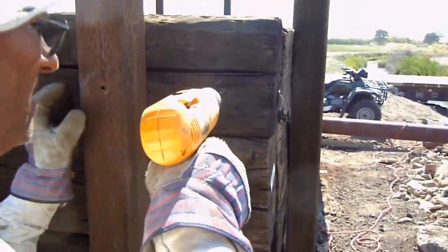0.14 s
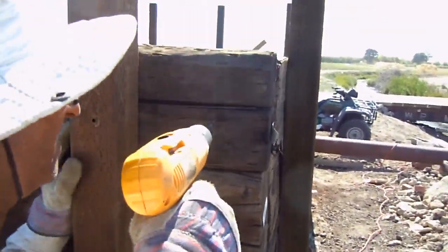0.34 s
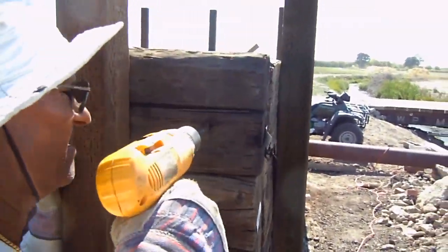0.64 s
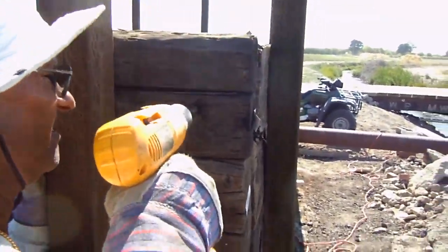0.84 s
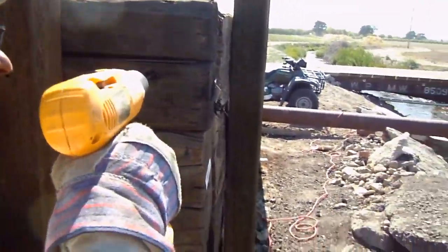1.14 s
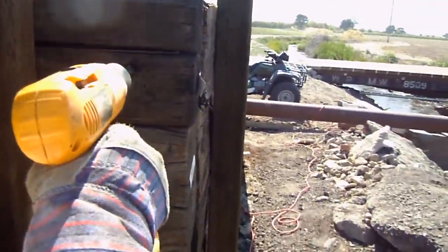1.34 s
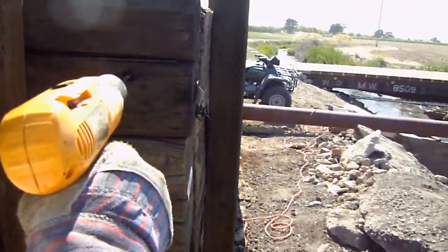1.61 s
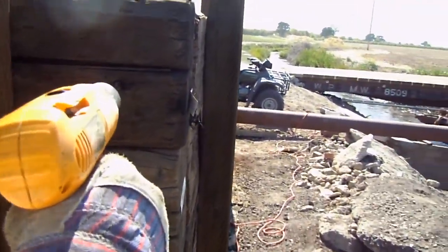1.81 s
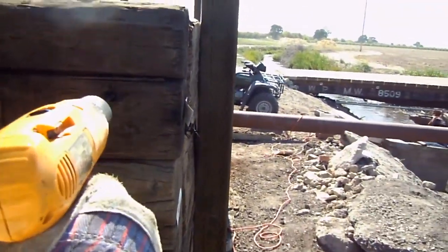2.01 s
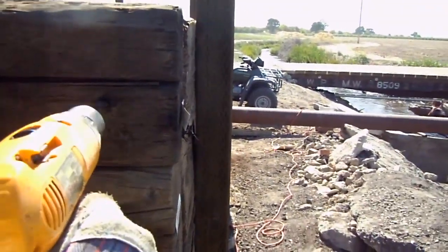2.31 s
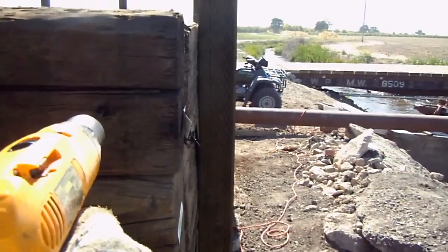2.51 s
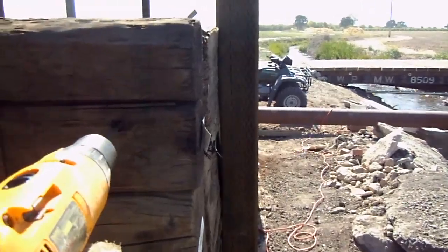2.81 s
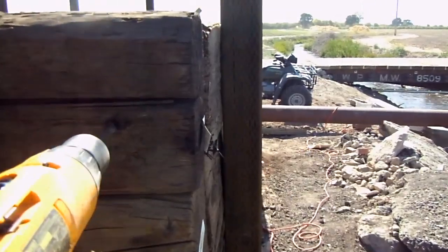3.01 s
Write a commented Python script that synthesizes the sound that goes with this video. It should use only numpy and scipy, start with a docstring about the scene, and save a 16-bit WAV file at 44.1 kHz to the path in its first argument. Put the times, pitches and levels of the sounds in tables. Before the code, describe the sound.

A corded electric drill clicks on, spins up fast to a bright, hissy whine, then sags slightly as it bites thick timber; outdoors, close stereo microphone, with wind rumbling, flapping and thumping throughout.

```python
"""A corded drill spins up and bores into thick timber outdoors: its fan and commutator whine as partials
locked to the shaft, over brush and air hiss made of filtered noise. The pitch sags under load,
the colour of the hiss changes at the bite, and the gears grow louder near the end.
Wind on two microphone ports is low rumble, flapping puffs, noise-burst gusts and pressure thumps."""
import sys
import numpy as np
from scipy import signal
from scipy.fft import rfft, irfft
from scipy.io import wavfile
from scipy.ndimage import map_coordinates

SR = 44100
rng = np.random.default_rng(int(sys.argv[2]) if len(sys.argv) > 2 else 0)


def transcribe(u):
    """Save the signal u as a 16-bit wav file named by the first command-line argument.

    u: samples, shape (n,) or (channels, n), limited to [-1, 1]; the rate is SR.
    q: integer samples, one column per channel.
    """
    v = np.clip(np.atleast_2d(u).T, -1, 1)
    q = np.round(v * 32767).astype(np.int16)
    wavfile.write(sys.argv[1], SR, q)


N = 138915
T, HZ = np.arange(N) / SR, np.fft.rfftfreq(N, 1 / SR)

BLADES = 11  # fan blades, so fan tones per shaft turn
START_S = .29
BITE_S, BITE_LENGTH_S = .93, .31  # passage from running free to running under load
SMEAR = .35  # phase wander of the motor partials, radians rms

# drill level before trims: time_s, hiss_db, top_db (against hiss), rasp_db (against hiss)
DRILL = [(.3, -49, -4, -6.5), (.36, -32, -4, -9), (.45, -25.5, -4.5, -10.5), (.58, -23.5, -3, -9.5),
         (.76, -25.5, -1, -7), (.82, -28, -1.5, -9), (1.02, -33, 0.5, -8), (1.55, -31.5, .5, -8),
         (2.21, -34, -.5, -8.5), (2.5, -32, -1, -9), (2.95, -27.5, -3, -9.5), (3.15, -26, -2, -9)]
# slow strength of the wind before trims: time_s, level_db
WIND = [(0.0, -21), (0.49, -27), (0.53, -17), (0.93, -22.5), (1.11, -27.5), (1.15, -22), (1.63, -21.5),
        (1.66, -25), (1.9, -22.5), (2.27, -26), (3.15, -27)]


def amp(db):
    """Level law: decibels to a pressure ratio."""
    return 10 ** (np.asarray(db) / 20)


def unit(x):
    """Normalisation: scales a signal to rms 1."""
    return x / np.sqrt(np.mean(x ** 2) + 1e-20)


def read(points):
    """Spectral interpolation: a frequency table read at every bin, on a logarithmic axis."""
    f, value = np.transpose(points)
    return np.interp(np.log(HZ + 1), np.log(f + 1), value)


def curve(rows):
    """Linear interpolation: each column of a time table at every sample."""
    s, *columns = np.transpose(rows)
    return [np.interp(T, s, c) for c in columns]


def shape(x, gain):
    """Linear filtering: the spectrum is multiplied by a gain per frequency."""
    return irfft(rfft(x) * gain, N)


def wander(hz):
    """Band-limited random modulation: smooth, rms 1, up to about the given rate."""
    knots = rng.standard_normal(4096)
    return unit(map_coordinates(knots, [T * 2 * hz], order=2, mode="wrap"))


def fade(s, length):
    """Smooth transition: a tanh step from 0 to 1 centred on s."""
    return .5 + .5 * np.tanh(2 * (T - s) / length)


def shaft():
    """Motor rotation: speed rises exponentially, then sags with load; its integral is the turn count."""
    # fan whine, blade-passing rate: time_s, pitch_hz
    blade_rate = [(.45,2760),(.5,2923),(.57,2941),(.65,2890),(.71,2870),(.755,2751),(.85,2752),(.93,2670),(1.05,2730),(1.18,2777),(1.3,2682),(1.42,2713),(1.53,2710),(1.65,2593),(1.73,2670),(1.88,2658),(2.05,2588),(2.19,2700),(2.29,2653),(2.38,2538),(2.45,2680),(2.56,2680),(2.65,2603),(2.76,2656),(2.87,2607),(3.15,2635)]
    spin_up_s, jitter, jitter_hz = .075, .0022, 50  # jitter is a fraction of the speed, rms
    spin = 1 - np.exp(-np.maximum(T - START_S, 0) / spin_up_s)
    # full speed is reached at the first row of the table
    spin = np.minimum(spin / np.interp(blade_rate[0][0], T, spin), 1)
    turns_per_s = curve(blade_rate)[0] / BLADES * spin * (1 + jitter * wander(jitter_hz))
    return np.cumsum(turns_per_s) / SR


def tone(turns, smear, rough=.22):
    """Random modulation: a partial wavers in level and phase; its rough share is narrow-band noise."""
    fray_hz = 70
    noise = wander(fray_hz) + 1j * wander(fray_hz)
    fray = np.sqrt(1 - rough) + np.sqrt(rough / 2) * noise
    phase = 2 * np.pi * (turns + rng.random()) + smear * wander(45)
    waver = amp(2 * wander(22) - 5)  # 2 dB rms about -5 dB
    return np.sqrt(2) * waver * (fray * np.exp(1j * phase)).real


def fan_whine(turns, rattle):
    """Blade-passing tone: one pressure pulse for each blade."""
    # fan tone before trim: time_s, level_db
    fan_level = [(.3, -59), (.5, -44), (.68, -39), (.8, -44), (.93, -40.5), (1.1, -46), (1.5, -42),
                 (2.05, -46), (2.5, -50.5), (3.15, -43)]
    return amp(curve(fan_level)[0] + 5) * tone(BLADES * turns, SMEAR, rattle)


def commutator_whine(turns, rattle):
    """Commutation tone at twice the blade rate, with a neighbour one shaft order below; both swell."""
    # swells before trim: time_s, half_length_s, level_db, below_db (tone one order below)
    swells = [(.48, .03, -38, -27), (.657, .045, -33, -22), (.737, .035, -19.5, -21), (.84, .065, -31, -32),
              (1.627, .05, -28, -42), (2.01, .08, -33, -42), (2.352, .05, -33, -39),
              (2.649, .045, -30, -39), (3.05, .18, -33, -36)]
    main, below = amp(-37.5), amp(-41)  # steady floors under the swells
    for s, half, db, below_db in swells:
        bump = np.exp(-((T - s) / half) ** 2)
        main = np.hypot(main, amp(db) * bump)
        below = np.hypot(below, amp(below_db) * bump)
    main_tone = main * tone(2 * BLADES * turns, SMEAR, rattle)
    below_tone = below * tone((2 * BLADES - 1) * turns, SMEAR)
    return amp(-.5) * (main_tone + below_tone)


def motor_orders(turns, level):
    """Shaft orders: chosen harmonics of the rotation, with a fainter buzz of many neighbours."""
    # motor tones before trim: order (multiple of shaft speed), level_db (against hiss)
    orders = [(10, -22), (16, -19), (19, -14), (20, -13), (23, -10), (27, -13), (31, -19), (33, -13),
              (37, -16)]
    motor = sum(amp(level + db - 1.5) * tone(k * turns, SMEAR) for k, db in orders)
    buzz = sum(amp(4 * wander(7)) * tone(k * turns, SMEAR) for k in range(16, 42))
    return motor + amp(level - 18) * buzz


def gear_mesh(turns, level):
    """Gear meshing: harmonics of the tooth-contact rate, growing louder late on."""
    # gear tones before the late rise: harmonic (multiple of mesh rate), level_db (against hiss)
    harmonics = [(1, -13), (2, -11.5), (3, -10.5), (6, -14), (7, -17)]
    mesh_per_turn = 2.86
    gears = sum(amp(db) * tone(k * mesh_per_turn * turns, .9, .15) for k, db in harmonics)
    rise_db = -9.75 + 6.5 * fade(2.36, .57)
    return gears * amp(level + rise_db)


def free_running(turns, level, loose):
    """Unloaded rotation: rough shaft-locked tones that fade out at the bite."""
    # free tones: order (multiple of shaft speed), level_db (against hiss), roughness (0-1)
    free_tones = [(4.4, -19, .15), (10.1, -15, .45), (13.4, -14, .25), (17.3, -14, .3), (24.5, -12, .3)]
    tones = sum(amp(db) * tone(k * turns, SMEAR, rough) for k, db, rough in free_tones)
    return amp(level) * loose * tones


def whine(turns):
    """Phase locking: every tonal part follows one shaft; fan and commutator are rougher before the bite."""
    level = curve(DRILL)[0]
    loose = 1 - fade(BITE_S, BITE_LENGTH_S)
    rattle = .04 + .3 * loose
    tones = fan_whine(turns, rattle) + commutator_whine(turns, rattle)
    tones += motor_orders(turns, level) + gear_mesh(turns, level)
    return tones + free_running(turns, level, loose)


def hiss(turns):
    """Broadband brush and air noise: gritty, modulated once a turn and coloured by the housing."""
    # running free: frequency_hz, density_db (per Hz)
    free_colour = [(590, -19), (1000, -19.5), (1140, -17), (1250, -17), (1900, -18.5), (2790, -12.5),
                   (4490, -9.5), (4850, -9), (5540, -4.5), (6750, -8), (9000, -2), (14000, -20.5)]
    # under load: frequency_hz, density_db (per Hz)
    loaded_colour = [(530, -19), (900, -11.5), (1200, -15.5), (1450, -9), (1800, -12.5), (2150, -11.5),
                     (2450, -12.5), (2720, -7), (3050, -13.5), (3500, -6), (3750, -9.5), (4300, -10.5),
                     (5250, -2.5), (6000, -4.5), (7200, -6.5), (8700, -3), (10300, -10), (14000, -22)]
    level, top, rasp = curve(DRILL)
    chop = 1 + .12 * np.cos(2 * np.pi * turns)
    grit = amp(1.5 * wander(600) + .7 * wander(35))
    drive = rng.standard_normal(N) * chop * grit
    load = fade(BITE_S, BITE_LENGTH_S)
    body = 1 / np.sqrt(1 + (690 / (HZ + 1)) ** 4)  # weakens the bass below 690 Hz
    # low, core low, core high and high edge in Hz, then level; the core sets the level of its band
    bands = [(0, 1800, 3800, 3800, level + rasp - 1),
             (3800, 3800, 7300, 7400, level - 2),
             (7400, 7500, 10000, SR, level + top + .5)]
    out = 0
    for spectrum, share in ((free_colour, 1 - load), (loaded_colour, load)):
        noise = shape(drive, amp(read(spectrum)) * body)
        for lo, core_lo, core_hi, hi, db in bands:
            core = np.std(shape(noise, (HZ > core_lo) & (HZ < core_hi)))
            band = shape(noise, (HZ >= lo) & (HZ < hi))
            out = out + share * amp(db) * band / core
    return out


def trigger():
    """Impact decay: small plastic clicks of the switch, as exponentially dying noise."""
    # clicks: start_s, level_db
    clicks = [(0.248, -42.5), (.315, -32.5)]
    decay_s = .0041
    envelope = sum(amp(db) * (T > s) * np.exp(-abs(T - s) / decay_s) for s, db in clicks)
    noise = shape(rng.standard_normal(N), 1 / (1 + (HZ / 10000) ** 4))
    return envelope * unit(noise)


def bounce(x):
    """Comb filtering: the timber reflects the sound over a path that changes as the drill sways."""
    delay_s = .0028 * (1 + .075 * wander(3))
    echo = amp(-9.5)
    reflected = map_coordinates(x, [(T - delay_s) * SR], order=3)
    return (x + echo * reflected) / np.hypot(1, echo)


def drill():
    """Interaural-style coherence: the ports share direct sound and differ in scatter, level and phase."""
    # likeness of the hiss at the ports: frequency_hz, coherence (0-1)
    likeness = [(1000, 1), (3000, 1), (6000, 0.89), (9000, 0.83), (13000, 0.55)]
    # left over right: frequency_hz, difference_db
    balance = [(1000, 0), (3100, 0), (5100, -1.5), (8400, -2.7), (13000, 0)]
    # left ahead of right: frequency_hz, phase_rad
    lead = [(1000, 0), (4000, .03), (5900, .4), (8500, .55), (10300, 1.05), (13000, .5)]
    turns, on = shaft(), fade(START_S, .023)
    same = np.clip(read(likeness), 0, 1)
    direct = shape(bounce(on * hiss(turns)), np.sqrt((1 + same) / 2))
    direct += fade(.39, .09) * whine(turns)  # tones emerge from the hiss near full speed
    direct += trigger()
    scattered = shape(on * hiss(turns), np.sqrt((1 - same) / 2))
    ports = []
    for side in (1, -1):
        transfer = amp(side * read(balance) / 2) * np.exp(.5j * side * read(lead))
        ports.append(shape(direct + side * scattered, transfer))
    return np.array(ports)


def gusts():
    """Turbulent bursts: fluttering noise whose upper corner rises with strength."""
    # gusts before trim and flutter: start_s, length_s, left_db, right_db
    bursts = [(0, 0.038, -29, -24.5), (0.194, 0.021, -31, -27), (0.514, 0.054, -23.5, -20),
              (0.559, 0.038, -22, -18.5), (0.763, 0.037, -26, -20), (0.804, 0.022, -18, -17.5),
              (0.889, 0.052, -25.5, -22), (0.941, 0.027, -25.5, -19.5), (1.143, 0.014, -20, -18),
              (1.174, 0.019, -31, -17), (1.206, 0.023, -19.5, -17), (1.233, 0.022, -19, -16),
              (1.26, 0.012, -19, -15.5), (1.276, 0.025, -24, -15), (1.303, 0.081, -24, -18.5),
              (1.393, 0.051, -22.5, -20), (1.851, 0.14, -25, -21), (1.875, 0.022, -18.5, -11.5),
              (1.899, 0.013, -33, -14.5), (1.916, 0.021, -20, -15.5), (2.049, 0.037, -26, -23),
              (2.307, 0.065, -37, -23), (2.411, 0.092, -30, -22), (2.601, 0.024, -24.5, -24),
              (2.797, 0.035, -20, -21.5), (3.012, 0.033, -22, -31)]
    edge_s, low_hz, top_hz = .00498, 123, 1980
    out, size = np.zeros((2, N)), 16384
    hz, t = np.fft.rfftfreq(size, 1 / SR), np.arange(size) / SR
    for start, length, *levels in bursts:
        envelope = np.clip(np.minimum(t, length + edge_s - t) / edge_s, 0, 1)
        first = max(round((start - edge_s / 2) * SR), 0)
        for port, db in zip(out, levels):
            corner = 610 * 2 ** ((db + 16.5) / 7.5)  # 610 Hz at -16.5 dB, an octave per 7.5 dB
            colour = hz / np.hypot(hz, low_hz)
            colour = colour / np.hypot(1, (hz / corner) ** 2.46) / np.hypot(1, (hz / top_hz) ** 6)
            noise = unit(irfft(rfft(rng.standard_normal(size)) * colour))
            part = port[first:][:size]
            part += (amp(db - 1.5) * envelope * noise)[:len(part)]
    flutter = [unit(amp(3.5 * wander(110))) for _ in out]
    return out * np.array(flutter)


def thumps():
    """Eddy pressure: each eddy is one bump with a shallow dip of opposite sign on either side."""
    # eddies: time_s, width_s, left_height, right_height (of the bump before the dip is taken off)
    eddies = [(.179, 0.0014, -0.28, -0.47), (0.2103, 0.0015, 0.17, 0.7), (.652, 0.0031, 0.35, 0.11),
              (0.766, 0.00076, 0.014, 0.94), (0.807, 0.001, 0.32, 0.91), (0.866, 0.0026, 0.15, 1),
              (0.94, 0.0015, 0.053, 0.99), (1.148, 0.00023, .02, 1), (1.16, 0.00079, -0.12, 0.68),
              (1.184, 0.00033, -0.048, -0.41), (1.23, 0.0018, 0.042, -.7), (1.291, 0.00033, 0.11, 0.98),
              (1.33, .0008, -0.0058, -0.52), (1.423, 0.0041, -0.24, -0.49), (1.432, 0.00081, 0.075, 0.95),
              (1.545, 0.004, 0.31, 0.56), (1.621, 0.0033, 0.074, 0.93), (1.879, 0.00032, 0.032, 0.71),
              (1.908, 0.00015, 0.087, 0.87), (1.926, 0.0046, -0.2, -0.52), (2.83, 0.0046, 0.063, 0.47),
              (3.02, 0.0032, 0.51, 0.3)]
    out = np.zeros((2, N))
    for s, width, left, right in eddies:
        u = (T - s) / width
        out += np.outer([left, right], np.exp(-u ** 2) - .29 * np.exp(-(u / 3) ** 2))
    return out


def puffs():
    """Intermittent turbulence: small brief eddies flap at each port all the time."""
    # colour of the puffs: frequency_hz, density_db (per Hz)
    puff_colour = [(60, -7.5), (160, 1), (330, -3), (600, -14.5), (1000, -31), (2000, -45.5), (4000, -51)]
    ports = []
    for _ in range(2):
        noise = shape(rng.standard_normal(N), amp(read(puff_colour)))
        lumps = amp(10 * np.minimum(wander(35.05), 2))  # swings of 10 dB rms, capped at +20 dB
        ports.append(unit(noise * lumps))
    return np.array(ports) * amp(curve(WIND)[0] - 7.5)


def rumble():
    """Turbulent pressure: lumpy low noise, mostly uncorrelated between the ports."""
    # colour of the rumble: frequency_hz, density_db (per Hz)
    rumble_colour = [(15, 0.5), (30, -0.5), (60, -2), (130, -5.5), (230, -10.5), (400, -25.5), (800, -43.5),
                     (4000, -78)]
    shared = .14  # common share of the power
    gain = amp(read(rumble_colour))
    left, right, both = [unit(shape(rng.standard_normal(N), gain)) for _ in range(3)]
    ports = []
    for own in (left, right):
        mixed = np.sqrt(1 - shared) * own + np.sqrt(shared) * both
        ports.append(unit(mixed * amp(2 * wander(20))))
    pan_db = np.array([[-1.75], [1.75]])  # left, right
    return np.array(ports) * amp(curve(WIND)[0] + 1 + pan_db)


def open_air():
    """Diffuse background: faint coloured noise, independent at each port."""
    # colour of the air: frequency_hz, density_db (per Hz)
    air_colour = [(100, 0), (1000, -37), (2000, -0.5), (5000, -6), (9000, -3), (11000, -13), (14000, -28)]
    gain = amp(read(air_colour))
    ports = [unit(shape(rng.standard_normal(N), gain)) for _ in range(2)]
    return amp(-60) * np.array(ports)


def scene():
    """Superposition: drill, wind and the faint hiss of open air add as pressures."""
    return drill() + gusts() + thumps() + puffs() + rumble() + open_air()


def record(dry):
    """Saturation and band limiting: soft overload near full scale, then a low-pass at 14150 Hz."""
    soft = dry / (1 + dry ** 4) ** (1 / 4)
    low_pass = signal.firwin(511, 14150, window=("kaiser", 9), fs=SR)
    return signal.oaconvolve(soft, low_pass[None], "same")


dry = scene()
out = record(dry)
transcribe(out)
```